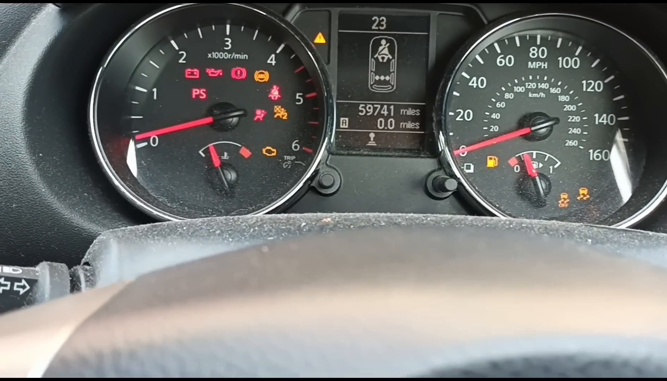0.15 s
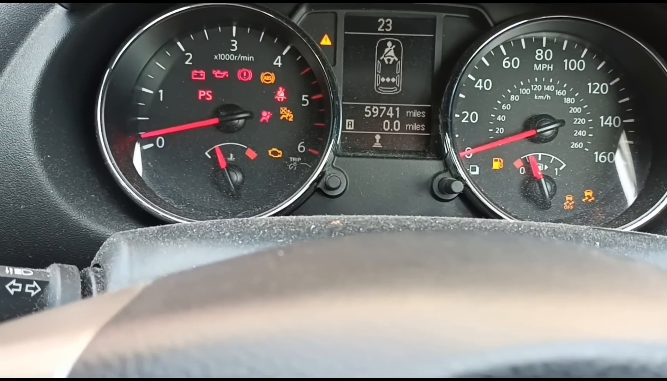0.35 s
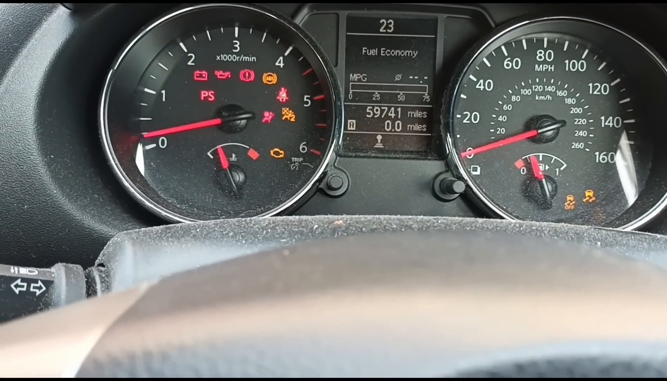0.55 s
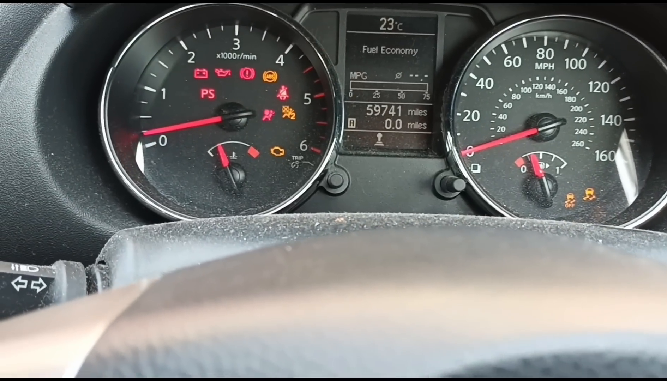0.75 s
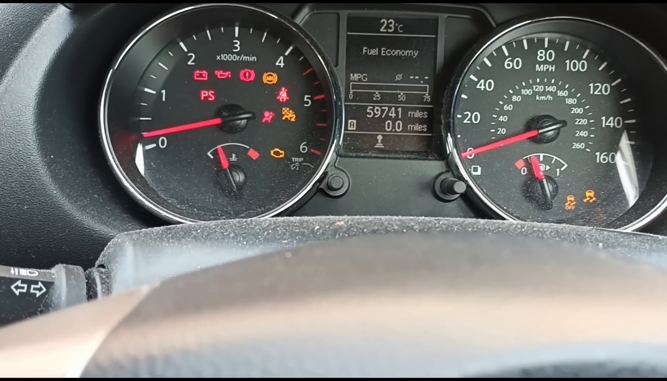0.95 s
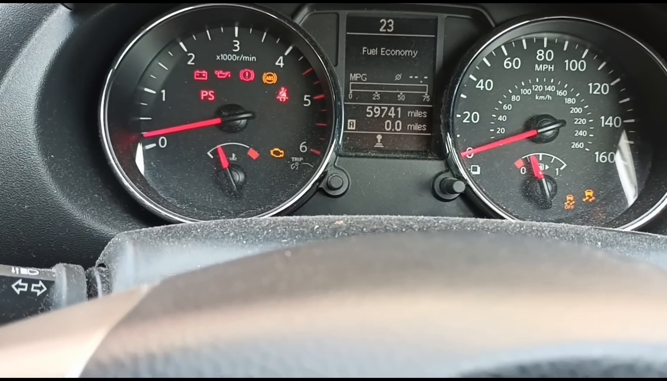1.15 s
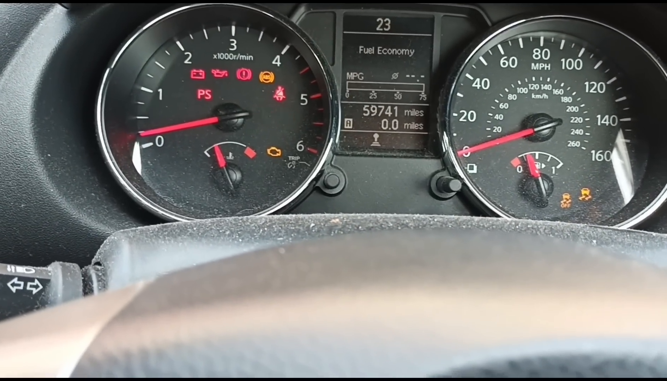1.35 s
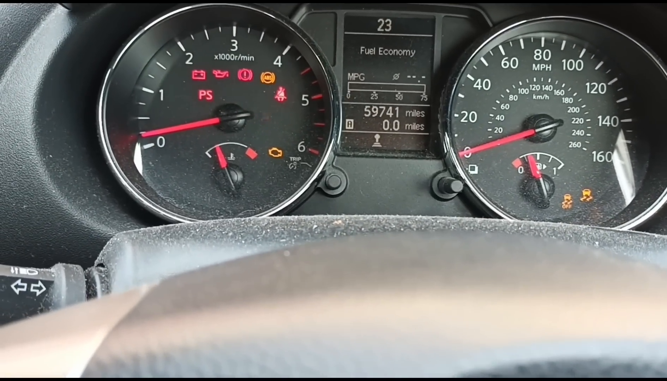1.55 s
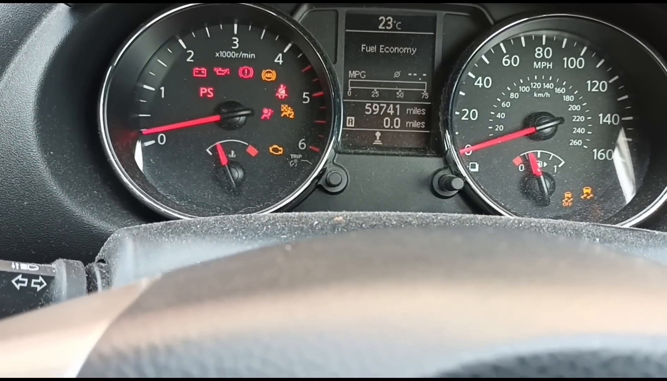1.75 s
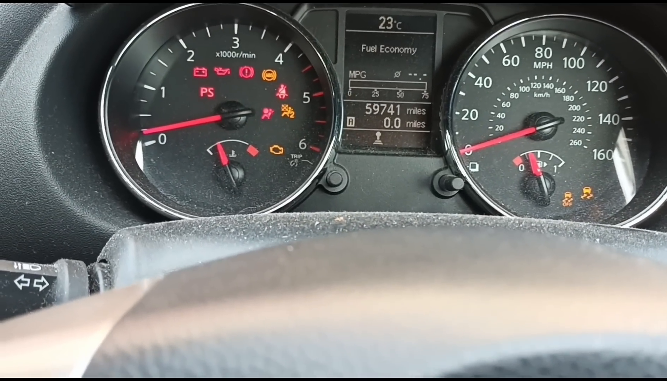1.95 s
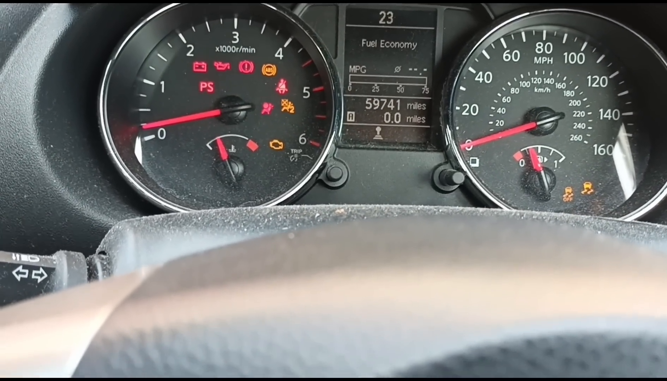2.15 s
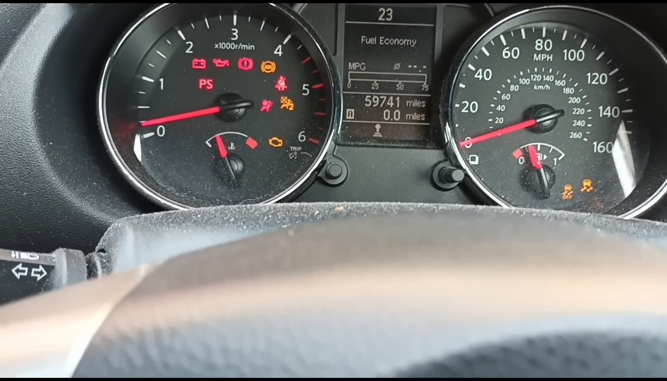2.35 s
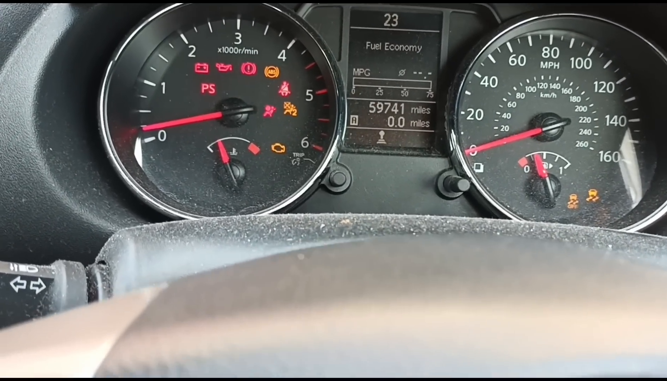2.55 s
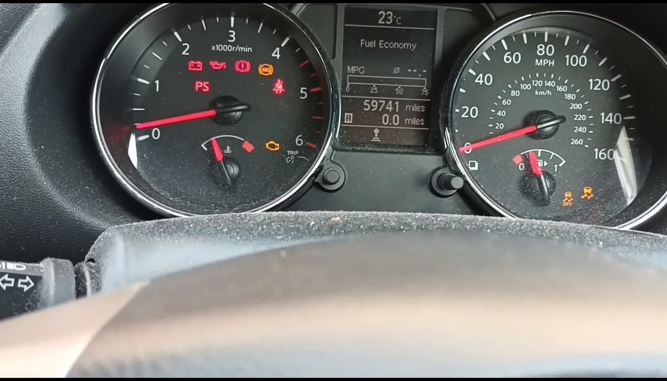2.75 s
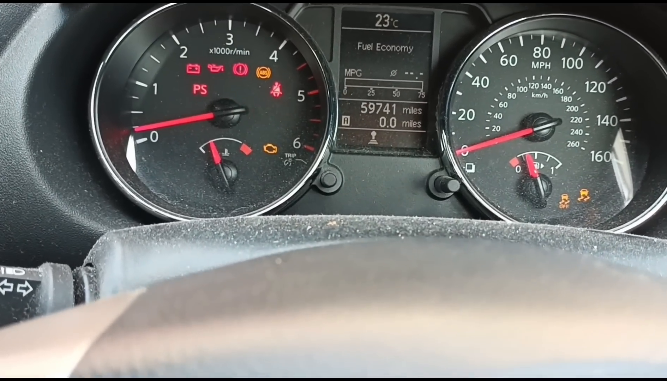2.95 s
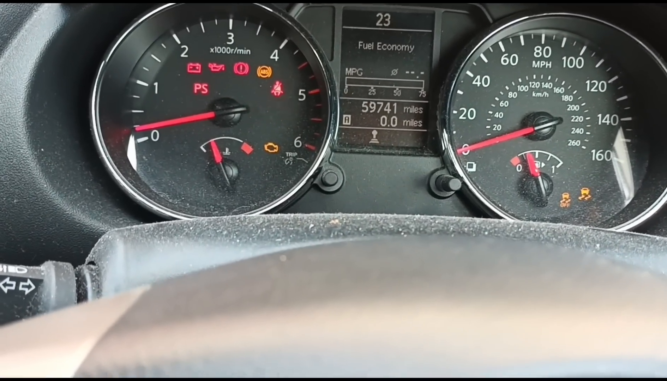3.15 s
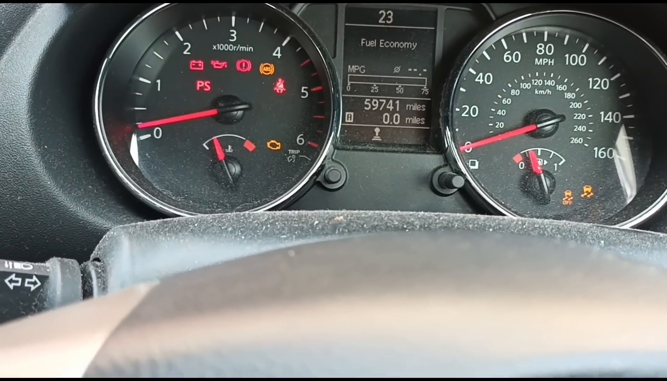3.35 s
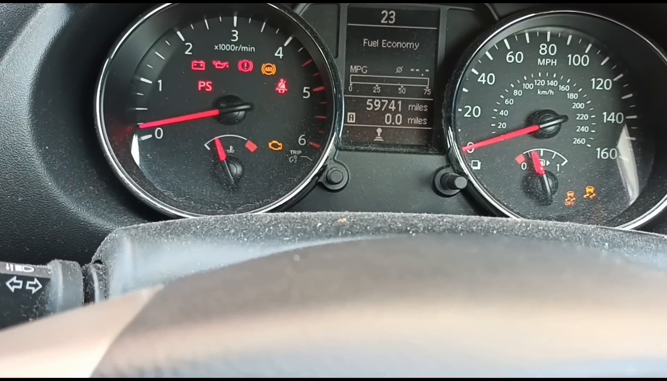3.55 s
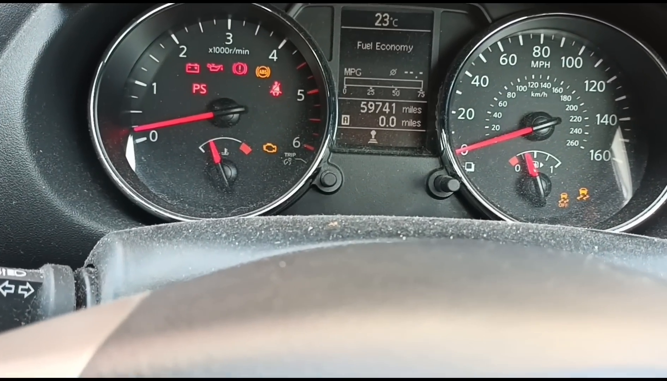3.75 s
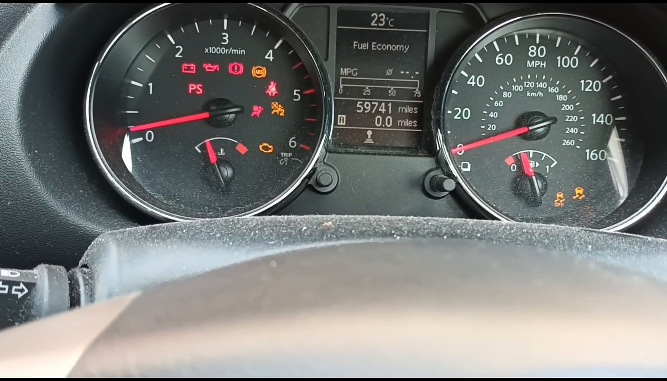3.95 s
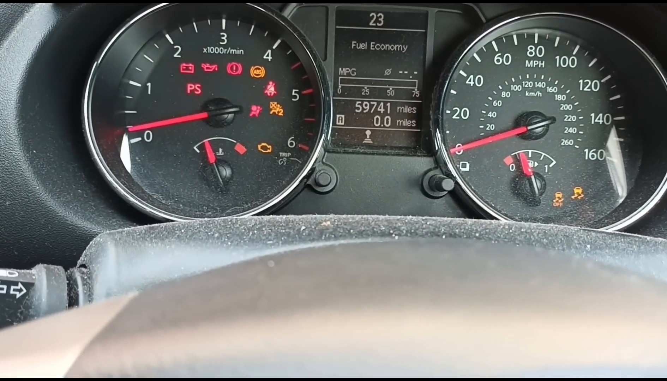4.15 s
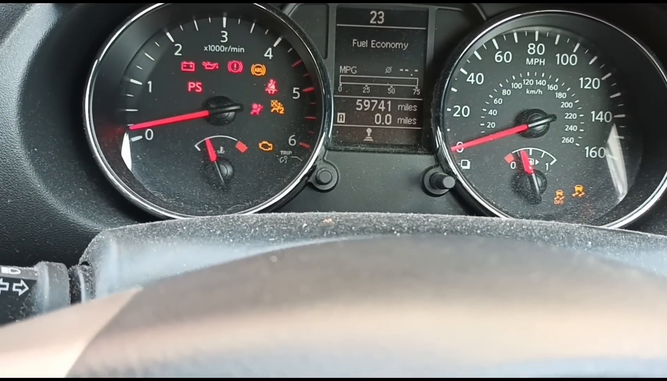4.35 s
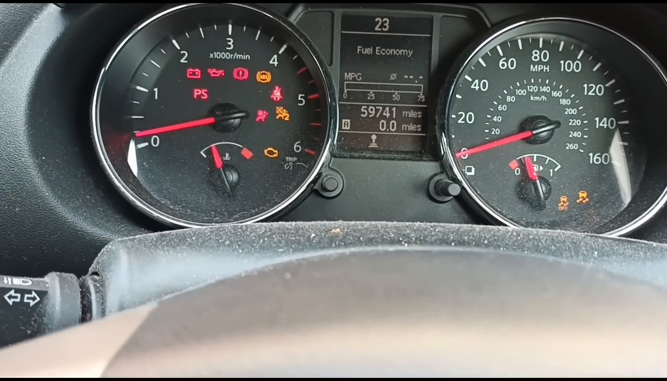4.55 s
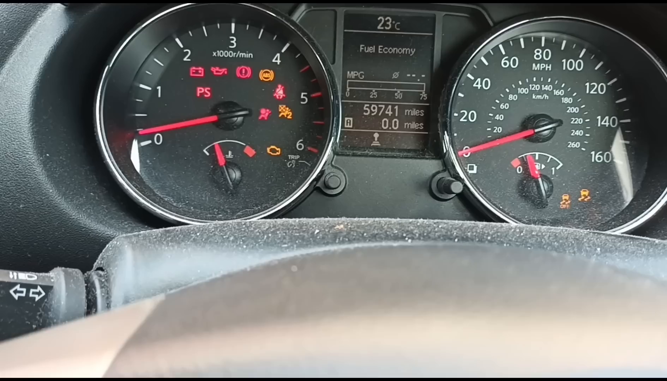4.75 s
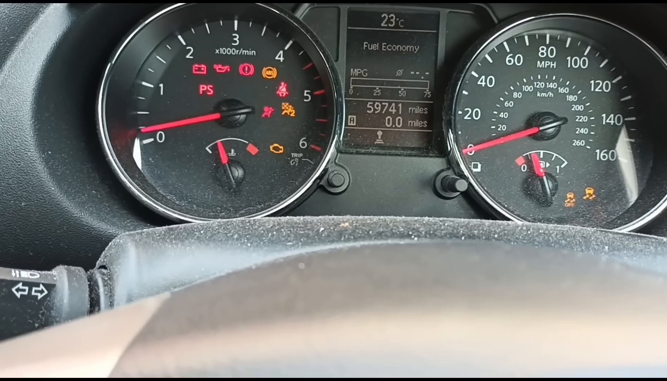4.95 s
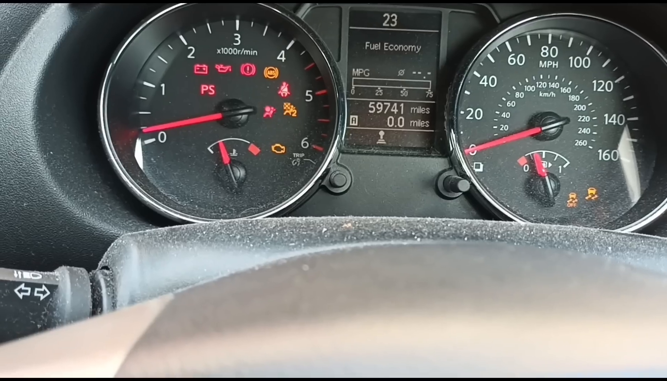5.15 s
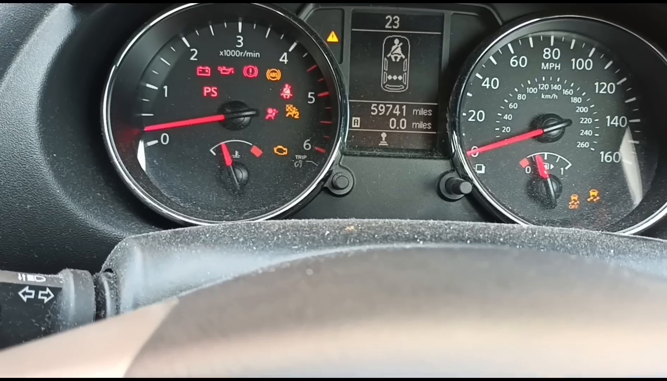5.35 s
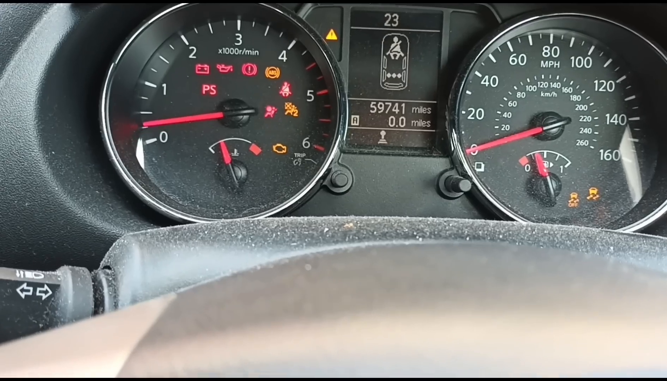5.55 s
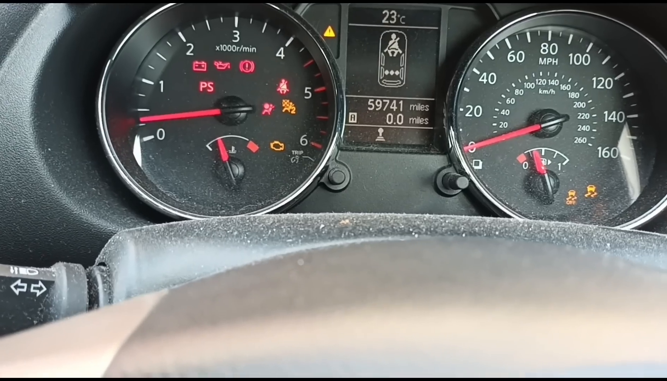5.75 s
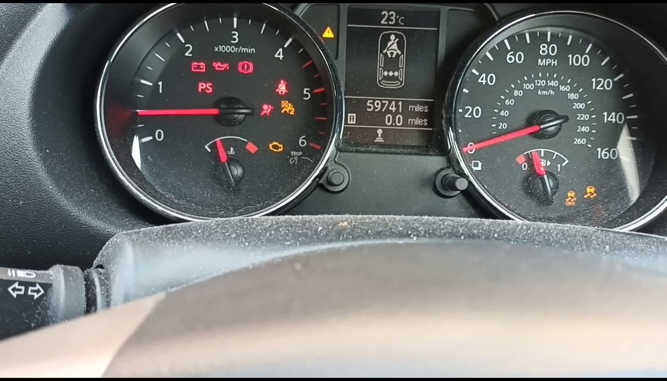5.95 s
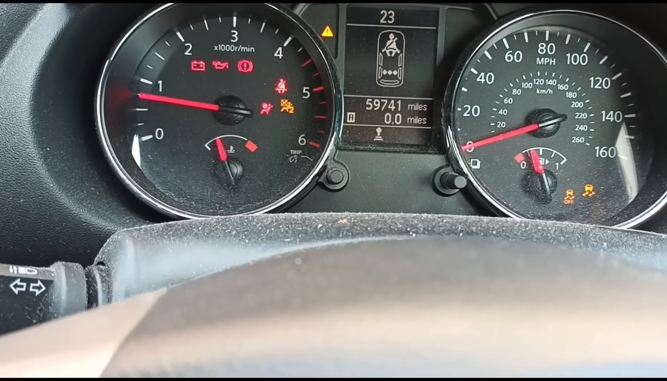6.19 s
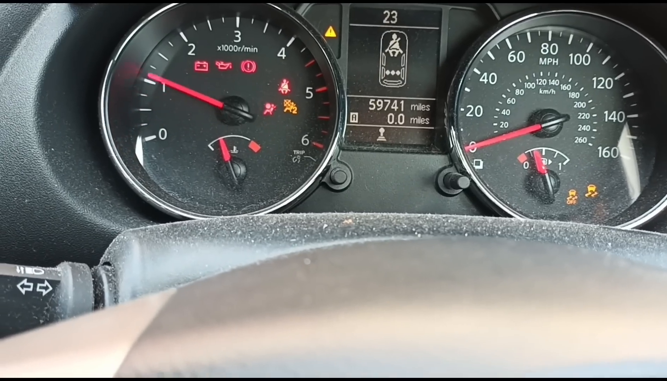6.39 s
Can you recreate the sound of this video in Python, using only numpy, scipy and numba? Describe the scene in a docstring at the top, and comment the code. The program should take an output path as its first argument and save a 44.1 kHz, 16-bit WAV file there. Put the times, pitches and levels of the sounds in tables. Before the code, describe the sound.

Inside a car, a rhythmic starter whine labours on, then the diesel engine knocks, shudders and rises into a booming rumble.

```python
"""Diesel start from the cabin

A starter drags a four-cylinder diesel over, its whine diving under the load of each compression. The engine
stumbles, knocks and rocks the car, then revs up, sweeping its firing orders through the body's resonances as a
faint turbo whistles. Close to a phone held at the wheel, sleeve cloth rustles by friction, the phone's case is
bumped and loose trim ticks."""
import sys
import numpy as np
from scipy import signal
from scipy.fft import rfft, irfft, next_fast_len
from scipy.io import wavfile
from scipy.ndimage import uniform_filter1d
from numba import njit

SR = 44100
rng = np.random.default_rng(int(sys.argv[2]) if len(sys.argv) > 2 else 0)


def master(y):
    """Save y as 16-bit WAV."""
    cut = np.clip(np.atleast_2d(y).T, -1, 1)
    pcm = np.round(cut * 32767)  # scale
    wavfile.write(sys.argv[1], SR, pcm.astype(np.int16))


N = 283122
T = np.arange(N) / SR


def undb(db):
    """Decibels to amplitude ratio."""
    return 10 ** (np.asarray(db) / 20)


def unit(x):
    """Normalisation to rms 1."""
    return x / np.sqrt(np.mean(x ** 2))


@njit
def resonator(x, hz, width):
    """Second-order resonance: a state-variable band-pass with gain 1 at the centre."""
    y, band, low = np.empty(len(x)), 0., 0.
    g, damping = np.tan(np.pi * hz / SR), width / hz
    for i in range(len(x)):
        v = (band + g * (x[i] - low)) / (1 + g * (g + damping))
        band, low, y[i] = 2 * v - band, low + 2 * g * v, damping * v
    return y


def ring(x, modes):
    """Modal superposition on each channel; modes are (frequency [Hz], bandwidth [Hz], gain [dB])."""
    return sum(undb(db) * np.array([resonator(side, float(hz), float(width)) for side in x])
               for hz, width, db in modes)


def curve(table):
    """Linear interpolation of columns in time, with a gate that closes outside the table."""
    times, *columns = np.transpose(table)
    gate = np.interp(T, [times[0] - .03, times[0], times[-1], times[-1] + .03], [0, 1, 1, 0])
    return gate, [np.interp(T, times, column) for column in columns]


def noise(spectrum, coherence, grain_db=0.):
    """Spectrally shaped noise, partly common to both channels; a heavy-tailed grain makes it crackle."""
    size = next_fast_len(N)
    common, *own = rng.standard_normal((3, size))
    white = np.sqrt(coherence) * common + np.sqrt(1 - coherence) * np.array(own)
    white *= undb(grain_db * rng.exponential(size=size))
    hz, db = np.transpose(spectrum)
    log_hz = np.log(np.fft.rfftfreq(size, 1 / SR) + 1)
    colour = undb(np.interp(log_hz, np.log(hz), db))
    return unit(irfft(rfft(white) * colour, size)[:, :N])


def wander(rate_hz):
    """Random modulation at rms 1: held values, smoothed twice."""
    hold = int(SR / rate_hz)
    steps = np.repeat(rng.standard_normal(N // hold + 1), hold)
    return unit(uniform_filter1d(uniform_filter1d(steps, hold), hold)[:N])


def humps(times, db, length, rise, tail_s):
    """Event envelopes: a linear attack over the fraction `rise` of the length, then exponential decay."""
    envelope = np.zeros(N)
    for onset, gain, span in zip(times, undb(db), np.broadcast_to(length, len(times))):
        cut = slice(int(onset * SR), int((onset + span + 8 * tail_s) * SR))
        age = T[cut] - onset
        attack = np.clip(age / (rise * span), 0, 1)
        envelope[cut] += gain * attack * np.exp(-np.maximum(age - span, 0) / tail_s)
    return envelope


def cabin_hush():
    """Background noise: a low-weighted spectrum with a slowly drifting level."""
    # cabin noise spectrum: (frequency [Hz], relative density [dB])
    spectrum = [(90, -30), (150, 0), (340, -11), (560, -25), (1000, -20), (1570, -21), (2300, -29),
                (5500, -29), (9500, -32), (11500, -38), (15500, -44)]
    return undb(-59.5 + .7 * wander(6)) * noise(spectrum, coherence=.2)


def panels(force):
    """Transmission loss: the bulkhead stops the treble; each panel mode reaches the two sides unequally."""
    # engine bay to cabin panels: (frequency [Hz], bandwidth [Hz], left gain [dB], right gain [dB])
    modes = [(265.5, 37, 4.5, -15), (348.5, 53, 3, -3.5), (452.5, 27, 2.5, -0.5), (642, 62, 0, -1),
             (734, 24, 2.5, 1), (857, 35, -4, -1), (986, 43, -23, -2.5), (1108, 51, -15, -3),
             (1370, 92, -8.5, -12), (1520, 28, -6.5, -6.5), (1716, 49, -20, -5.5)]
    dull = signal.sosfilt(signal.butter(4, 2300, fs=SR, output="sos"), force)
    return sum(undb([[left], [right]]) * ring(dull, [(hz, width, 0)]) for hz, width, left, right in modes)


def housing(force):
    """Band-limited resonance: the starter housing rings in its treble modes."""
    # housing modes: (frequency [Hz], bandwidth [Hz], gain [dB])
    modes = [(3280, 3340, 0), (4320, 68, 1.5), (5700, 870, -6.5), (7200, 120, -42), (8760, 1200, -10)]
    return signal.sosfilt(signal.butter(4, [2200, 10500], "band", fs=SR, output="sos"), ring(force, modes))


def motor_whine(times, length, slowdown, fundamental_db):
    """Frequency modulation by load: compression slows the motor, so its harmonics dive in pitch."""
    unloaded_hz, dive_s = 414.5, .098
    dive_edges = np.column_stack([times + length - dive_s, times + length]).ravel()
    squeeze = np.interp(T, dive_edges, np.tile([0, 1], len(times)))
    middles = times + length / 2
    sag = np.interp(T, middles, slowdown) / (1 + np.exp(-(squeeze - .5) / .13))
    phase = 2 * np.pi * np.cumsum(unloaded_hz * (1 - sag) * (1 + .02198 * wander(80))) / SR
    # overtones peak in mid-dive, the fundamental later, when the motor is slower
    overtones = sum(undb(db) * np.sin(k * phase) for k, db in enumerate([-3, -13, -10.5, -14.5], 2))
    overtones *= undb(.9 * wander(70)) * np.exp(-((squeeze - .55) / .41) ** 2)
    fundamental = undb(np.interp(T, middles, fundamental_db) + 1.13 * wander(70)) * np.sin(phase)
    return overtones + fundamental * np.exp(-((squeeze - .7) / .31) ** 2)


def starter():
    """Structure-borne sound: motor and gears drive panels and housing; the block thumps its mounts."""
    # compression strokes: (time [s], level [dB])
    strokes = [(0.0, -59), (0.089, -44), (0.256, -45), (0.427, -42.5), (0.625, -45), (0.8, -43),
               (0.976, -43.5), (1.143, -42.5), (1.339, -44.5), (1.522, -43.5), (1.697, -45.5), (1.869, -43),
               (2.066, -45), (2.252, -43), (2.431, -44), (2.606, -43.5), (2.808, -44.5), (2.994, -43.5),
               (3.178, -44.5), (3.348, -43), (3.558, -45.5), (3.747, -44), (3.924, -45), (4.097, -44)]
    # cylinders in turn, before the battery fades:
    # (stroke length [s], slowdown [0-1], fundamental gain [dB], thump level [dB])
    cylinders = [(.098, .30, -1, -42.5), (.097, .325, 3.5, -43), (.094, .24, -2, -43),
                 (.114, .325, 4, -41.5)]
    # loose pinion rattle as the engine outruns the starter: (time [s], level [dB])
    overrun = [(4.2, -69), (4.6, -62), (5.1, -66), (5.45, -66)]
    # cabin air and floor pan modes: (frequency [Hz], bandwidth [Hz], gain [dB])
    boom_modes = [(44.05, 9.5, -4), (72.9, 9.6, -11), (107, 4.3, -70)]
    times, db = np.transpose(strokes)
    length, slowdown, fundamental_db, thump_db = np.array(cylinders)[np.arange(len(times)) % 4].T
    tiring = 1 + .035 * times  # the battery fades: strokes get longer and slower
    length, slowdown = length * tiring, slowdown * tiring
    whine = motor_whine(times, length, slowdown, fundamental_db)
    load = humps(times, db, length, rise=.2, tail_s=.017)
    teeth = undb(6.5) * rng.standard_normal((2, N))
    force = load * undb(1.5 * wander(60)) * (undb(3) * whine + teeth)
    gear_load = undb(-51.5) + uniform_filter1d(load, 1800)
    grind = undb(-15.5) * housing(gear_load * rng.standard_normal((2, N)))
    gate, (rattle_db,) = curve(overrun)
    rattle = gate * undb(rattle_db + 2.5 * wander(60)) * unit(housing(rng.standard_normal((2, N))))
    push = humps(times + .0156, thump_db, .0059, rise=.48, tail_s=.00073)
    shake = (undb(-37.5) + humps(times, thump_db, length, rise=.22, tail_s=.096)) * rng.standard_normal(N)
    thump = ring([undb(25) * push + undb(20) * shake], boom_modes)[0]
    return undb(3.5) * panels(force) + grind + rattle, thump


def sleeve():
    """Friction noise: cloth hisses as it drags."""
    # drags of the cloth: (time [s], level [dB], length [s])
    drags = [(1.42, -50, 0.21), (1.645, -49, 0.15), (1.846, -57, 0.17), (2.0, -58.5, 0.081),
             (5.66, -55.5, 0.15), (5.8, -59, 0.19)]
    # rustle spectrum: (frequency [Hz], relative density [dB])
    spectrum = [(880, 1), (1500, 4.5), (1770, -1.5), (2620, -0.5), (3380, -1.5), (9140, -2.5),
                (15500, -18.5)]
    drag = humps(*np.transpose(drags), rise=.68, tail_s=.05) * undb(.5 * wander(24.34))
    return drag * noise(spectrum, coherence=.1, grain_db=.8)


def case_bumps():
    """Damped oscillation: the phone's case rings dully when bumped in the hand."""
    # bumps: (time [s], level [dB], frequency [Hz])
    bumps = [(1.549, -32.5, 91), (1.716, -26.5, 112.5), (2.051, -30.5, 102.4)]
    out = np.zeros(N)
    for onset, db, hz in bumps:
        age = np.clip(T - onset, 0, 1)
        out += undb(db) * np.sin(2 * np.pi * hz * age) * (age / .012) * np.exp(1 - age / .011)
    return out


def trim_ticks():
    """Impact excitation: brief noise bursts ring the modes of loose plastic trim."""
    # ticks: (time [s], level [dB])
    ticks = [(2.039, -36), (4.2724, -55), (4.95, -46), (5.031, -38.5), (5.208, -50), (5.228, -49.5),
             (5.2942, -65), (6.1773, -43), (6.2245, -48)]
    # trim modes: (frequency [Hz], bandwidth [Hz], gain [dB])
    modes = [(1000, 780, 1.5), (1640, 550, 5.5), (2550, 280, -2), (4560, 250, -4), (6000, 800, -6),
             (8800, 770, 0)]
    force = humps(*np.transpose(ticks), .004, rise=.3, tail_s=.005) * rng.standard_normal((2, N))
    return signal.sosfilt(signal.butter(2, 9000, fs=SR, output="sos"), ring(force, modes))


def rumble(throb):
    """Amplitude modulation: the stumbling engine's low noise thumps at the firing rate."""
    # rumble envelope: (time [s], level [dB])
    levels = [(4.2, -46.5), (4.47, -35.5), (4.84, -41.5), (4.976, -29), (5.094, -29.5), (5.2, -35),
              (5.45, -41)]
    gate, (db,) = curve(levels)
    force = (1.2 + throb) * rng.standard_normal(N)
    return gate * undb(db) * unit(resonator(resonator(force, 89., 65.), 85., 132.))


def shudder():
    """Transient response: each early firing rocks the body in a few low swings that climb in pitch."""
    # jolts: (time [s], level [dB], starting frequency [Hz], length [s])
    jolts = [(4.226, -37, 32.4, 0.054), (4.365, -24.5, 32.3, 0.027), (4.441, -25, 31.3, .04),
             (4.52, -24, 37.1, .13), (4.688, -23.5, 35.7, 0.034)]
    climb_hz_per_s = 47
    out = np.zeros(N)
    for onset, db, hz, length in jolts:
        age = np.clip(T - onset, 0, 1)
        swing = np.sin(2 * np.pi * (hz + climb_hz_per_s * age / 2) * age)
        out += humps([onset], [db], [length], rise=.28, tail_s=.016) * swing
    return out


def knocks():
    """Impact excitation: the first uneven firings strike panels and housing, each with its own ring."""
    # firings: (time [s], level [dB], ring frequency [Hz])
    firings = [(4.322, -27.5, 700), (4.434, -32, 870), (4.526, -30.5, 900), (4.626, -26, 820),
               (4.663, -40, 760), (4.761, -33.5, 850), (4.802, -43.5, 600), (4.847, -34, 872),
               (5.318, -42.5, 740), (5.425, -29.5, 687)]
    times, db, ring_hz = np.transpose(firings)
    force = humps(times, db, .03, rise=.35, tail_s=.018) * rng.standard_normal((2, N))
    out = undb(-3) * panels(force) + undb(-32) * housing(force)
    for onset, hz in zip(times, ring_hz):
        start, stop = int(onset * SR), int((onset + .027) * SR)
        fade = np.hanning(2 * (stop - start))[stop - start:]
        out[:, start:stop] += undb(9) * ring(force[:, start:stop], [(hz, 110, 0)]) * fade
    return out


def body_gain(hz):
    """Frequency response of the car body: its resonances add in power."""
    # body modes: (frequency [Hz], bandwidth [Hz], gain [dB])
    modes = [(24.2, 12, -43), (35, 6, -30), (46, 15.8, -21), (65, 4.2, -24), (75.2, 7, -29),
             (85.06, 4.3, -23), (102.6, 9.5, -20.5), (116.4, 8.8, -26), (149.6, 24, -29), (183, 18, -34),
             (223, 21, -30.5), (269, 48, -29)]
    return np.sqrt(sum(undb(2 * db) / (1 + (2 * (hz - centre) / width) ** 2) ** 2
                       for centre, width, db in modes))


def engine_orders():
    """Forced vibration: harmonics of the firing rate sweep the body modes. Also gives the firing count."""
    # run-up: (time [s], firing rate [Hz], drive level [dB])
    run_up = [(4.76, 23.31, -9), (4.8, 22.05, 11), (4.855, 23, 1.5), (4.89, 22, 10.5), (4.96, 20.27, 13.5),
              (5.09, 23.8, 15.5), (5.135, 24.85, 0), (5.165, 25.55, 1.5), (5.215, 26.55, 12.5),
              (5.28, 31.05, 0.1), (5.335, 34.52, -8), (5.37, 36.8, 0.1), (5.44, 40.8, -10),
              (5.49, 44, -0.2), (5.64, 53.6, 0.3), (5.87, 69.55, 0.5), (6.12, 81.9, 0.7),
              (6.28, 89.24, -0.4), (6.42, 92.6, -1.5)]
    # firing orders 1, 2, 3: (relative level [dB])
    orders_db = [0, -6, -12.5]
    gate, (hz, drive_db) = curve(run_up)
    cycles = np.cumsum(hz * (1 + .006 * wander(30))) / SR
    boom = np.zeros(N)
    for k, db in enumerate(orders_db):
        order = k + 1
        rms = undb(drive_db + db + .67 * k * wander(40)) * body_gain(order * hz)
        boom += rms * np.sqrt(2) * np.sin(2 * np.pi * order * cycles - 1.67 * k)
    # half orders from unequal cylinders, and two faint high orders
    for order, db in [(.5, -42), (1.5, -46), (4, -56), (5, -54)]:
        boom += undb(drive_db + db + 3 * wander(30)) * np.sin(2 * np.pi * order * cycles)
    return gate * boom, cycles


def combustion(cycles, throb):
    """Combustion noise: clatter pulses with a random strength at each firing, over a low roar."""
    # envelope of clatter and roar: (time [s], level [dB])
    levels = [(4.85, -50), (5.02, -63.5), (5.414, -52.5), (5.654, -45.5), (5.986, -42), (6.42, -41)]
    # clatter spectrum: (frequency [Hz], relative density [dB])
    spectrum = [(120, -51), (200, -13), (268, -5), (318, -4), (447, -6.5), (522, -14), (858, -8),
                (1210, -17.5), (1790, -17.5), (2240, -27.5), (3740, -32.5), (5180, -32.5), (12000, -46.5),
                (15600, -87), (22000, -120)]
    gate, (db,) = curve(levels)
    level = gate * undb(db)
    roar = 1.22 * unit(resonator(resonator(rng.standard_normal(N), 65., 140.), 79., 200.))
    strength = undb(2.5 * rng.standard_normal(N // 100)[cycles.astype(int)])
    clatter = unit(.8 + throb * strength) * noise(spectrum, coherence=.15, grain_db=1.2)
    return level * clatter, level * roar


def cloth_scrapes():
    """Sliding friction: cloth crackles brightly, with a duller resonant rub below."""
    # scrapes: (time [s], crackle level [dB], rub level [dB], crackle length [s])
    scrapes = [(5.039, -56, -51.5, 0.035), (5.088, -68, -48.5, 0.032), (5.471, -42.5, -35, 0.029),
               (5.4984, -30.5, -68, 0.017), (5.518, -62, -37, 0.0065), (5.558, -49, -71, 0.022),
               (5.596, -56, -53.5, 0.048), (5.688, -50, -50, 0.059), (5.738, -49.5, -54, .035),
               (5.916, -70, -48, .017), (5.955, -58, -55.5, 0.021)]
    # crackle spectrum: (frequency [Hz], relative density [dB])
    spectrum = [(1180, -59), (2000, -21), (4210, -4), (4550, -10), (5270, -10), (7480, -4), (7950, -1),
                (15500, -22.5)]
    times, crackle_db, rub_db, length = np.transpose(scrapes)
    crackle = noise(spectrum, coherence=.13, grain_db=2.3)
    crackle *= humps(times, crackle_db, length, rise=.2, tail_s=.01)
    rub = unit(ring(rng.standard_normal((2, N)), [(990, 170, 7), (1480, 2400, -4.5)]))
    rub *= humps(times, rub_db, .62 * length, rise=.64, tail_s=.013)
    return crackle + rub


def turbo():
    """Line broadening: fast frequency jitter spreads the turbo's rising tone into a narrow band."""
    # whistle: (time [s], frequency [Hz], level [dB])
    whistle = [(6.14, 5150, -72), (6.25, 5255, -63), (6.42, 5400, -66)]
    gate, (hz, db) = curve(whistle)
    phase = 2 * np.pi * np.cumsum(hz * (1 + .015 * wander(900))) / SR
    return gate * undb(db + 3 * wander(50)) * np.sin(phase)


def scene():
    """Superposition: the bass is common to both sides, stronger on the left; the whole left side lags."""
    hush = undb([[.8], [-.8]]) * cabin_hush()
    crank, thump = starter()
    boom, cycles = engine_orders()
    throb = np.exp(-(cycles % 1) / .27)  # one decaying pulse per firing
    clatter, roar = combustion(cycles, throb)
    bass = undb([[2.1], [-2.3]]) * (thump + case_bumps() + rumble(throb) + shudder() + boom + roar)
    nearby = undb([[.7], [-.7]]) * (sleeve() + trim_ticks() + cloth_scrapes())
    left, right = hush + crank + bass + nearby + knocks() + clatter + turbo()
    lag_samples = 40
    return np.array([np.r_[np.zeros(lag_samples), left[:-lag_samples]], right])


def record(dry):
    """Band limiting: the phone drops the deepest bass and cuts the top."""
    x = signal.sosfilt(signal.butter(2, 22, "high", fs=SR, output="sos"), dry)
    return signal.sosfilt(signal.ellip(10, .2, 70, 15500, fs=SR, output="sos"), x)


dry = scene()
out = record(dry)
master(out)
```